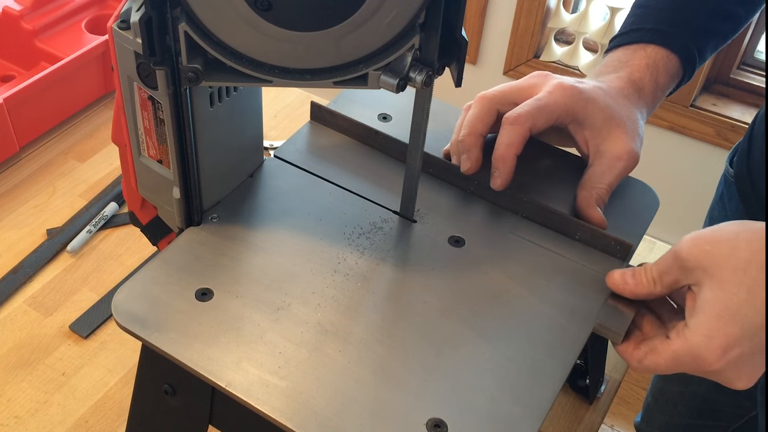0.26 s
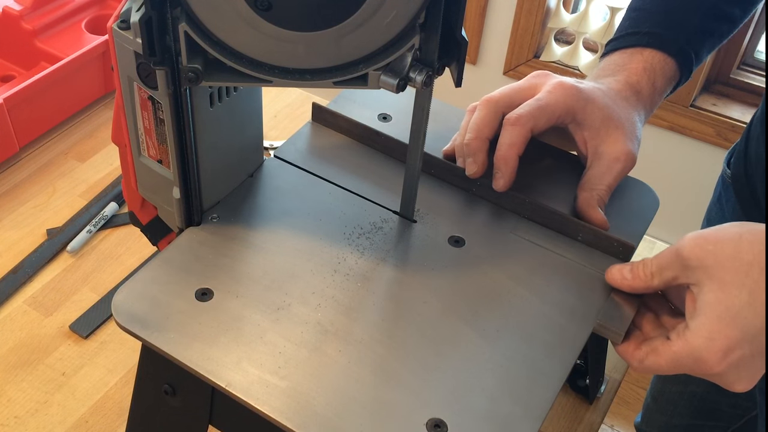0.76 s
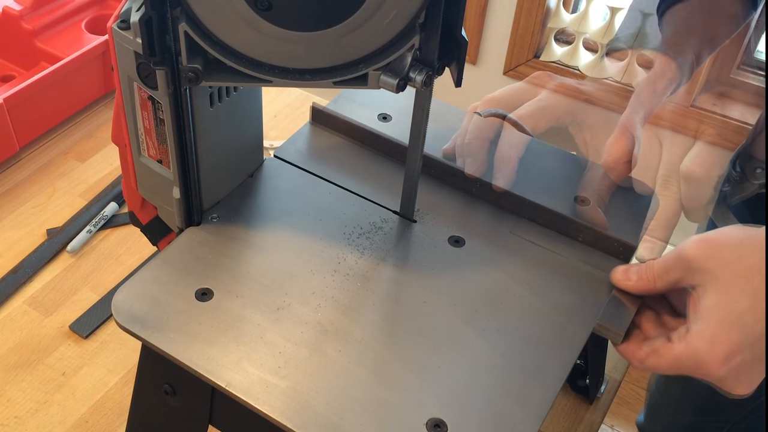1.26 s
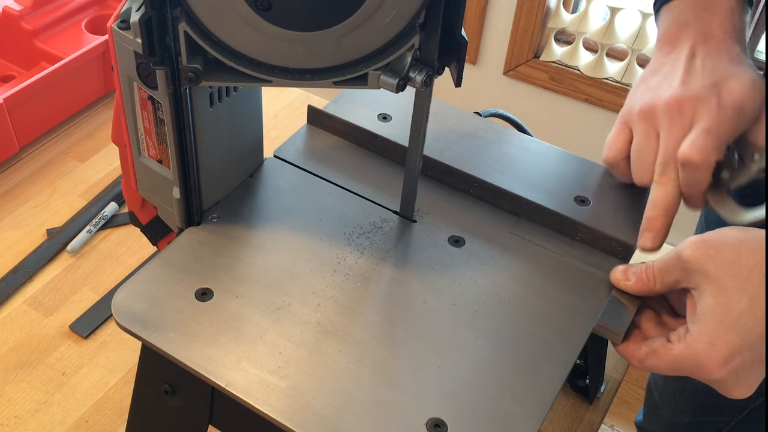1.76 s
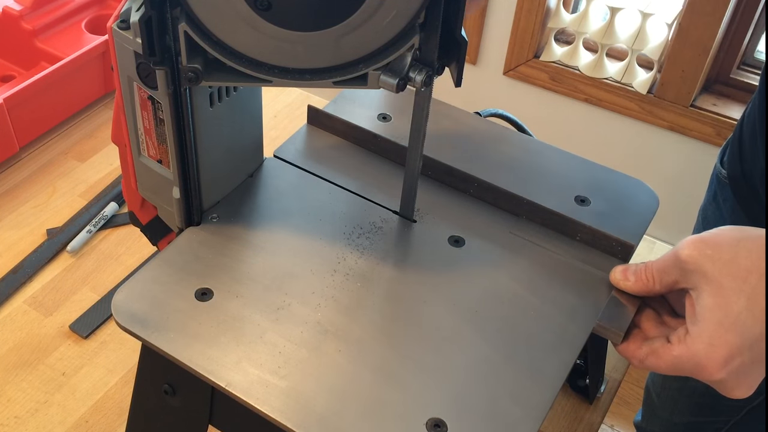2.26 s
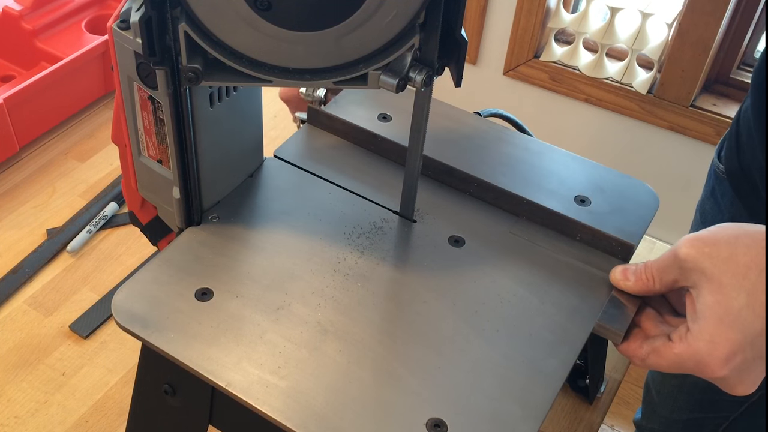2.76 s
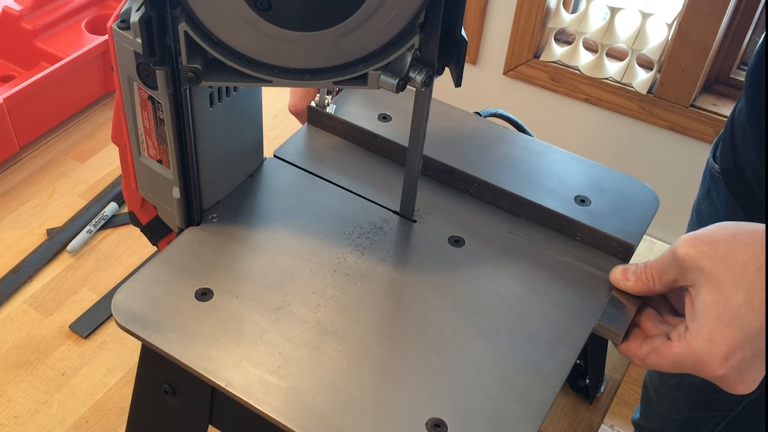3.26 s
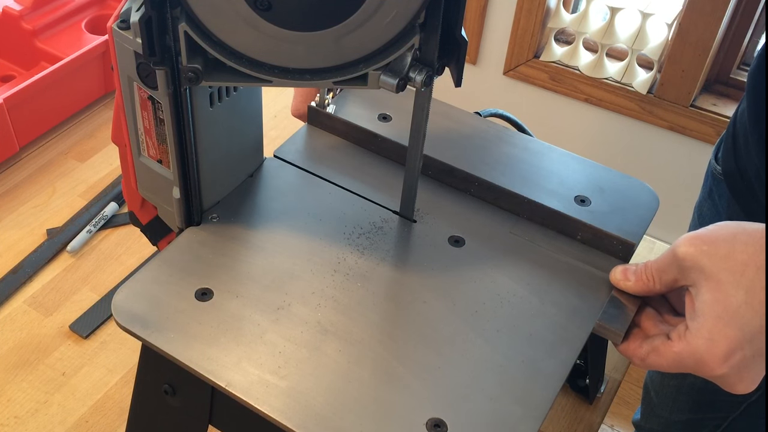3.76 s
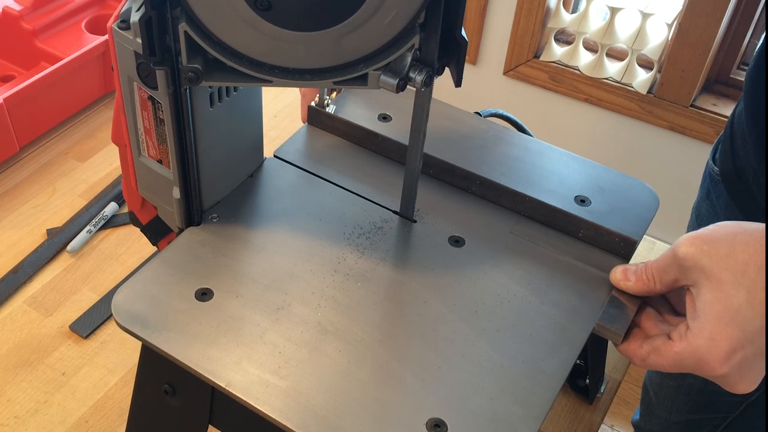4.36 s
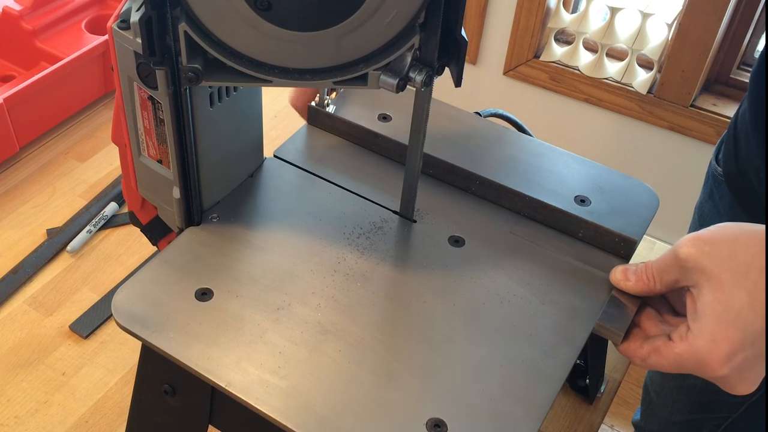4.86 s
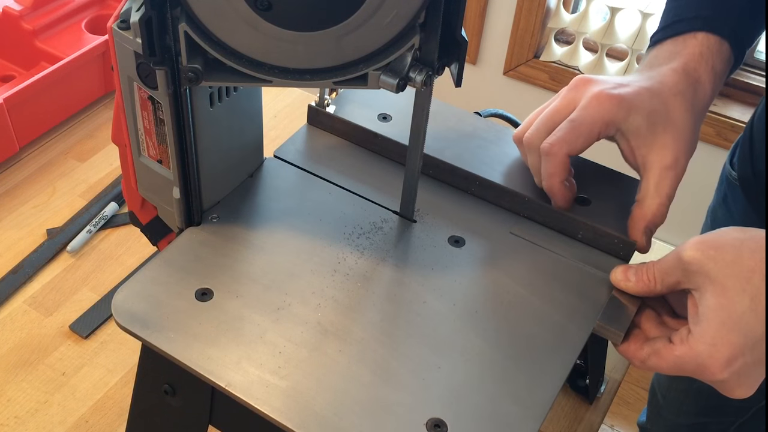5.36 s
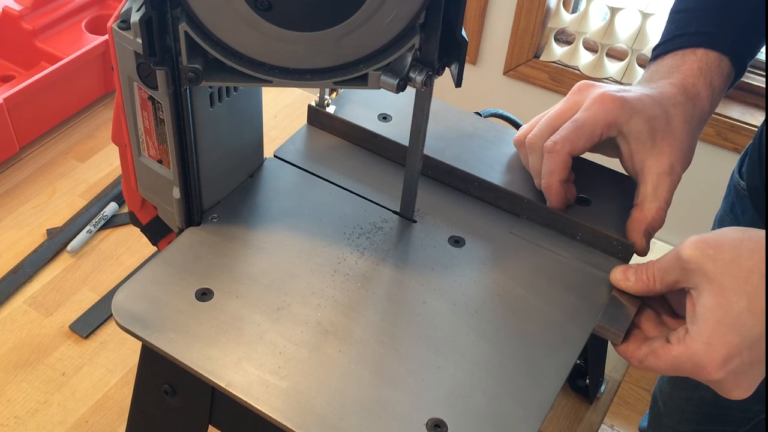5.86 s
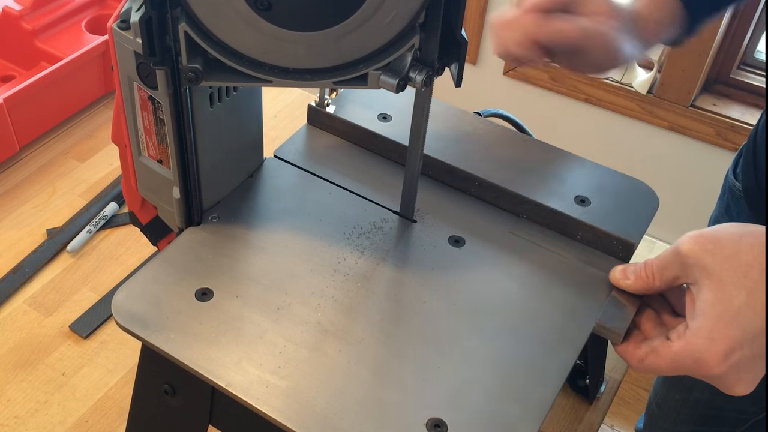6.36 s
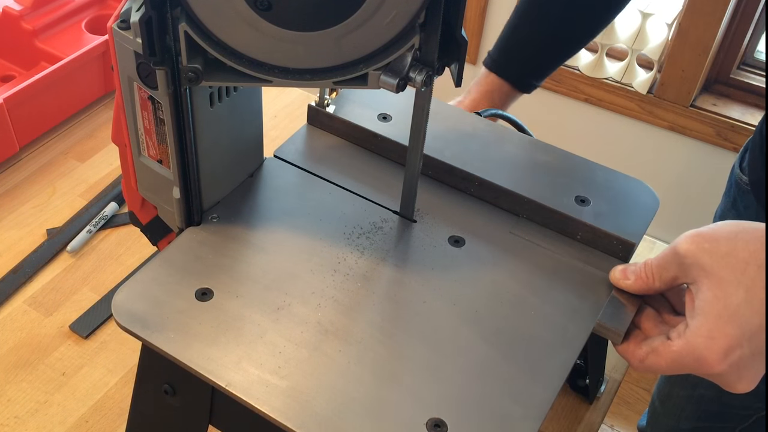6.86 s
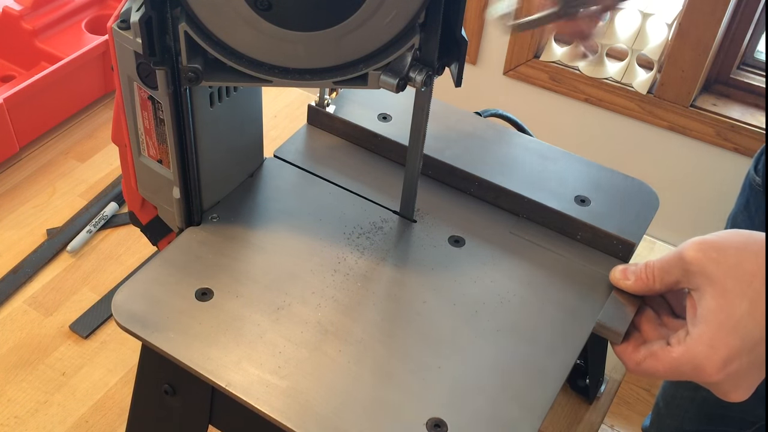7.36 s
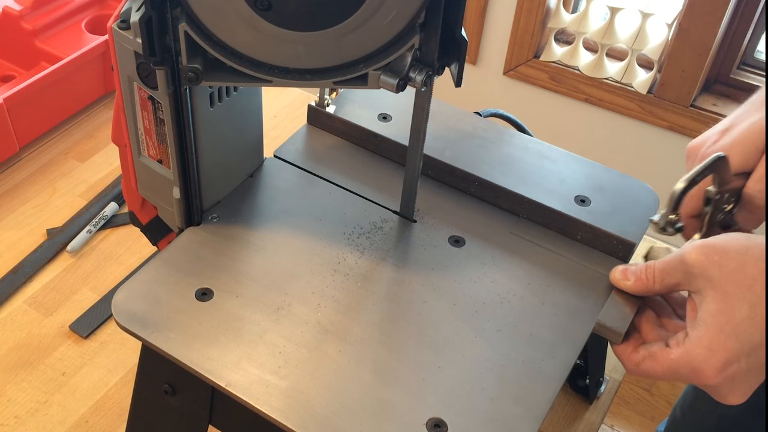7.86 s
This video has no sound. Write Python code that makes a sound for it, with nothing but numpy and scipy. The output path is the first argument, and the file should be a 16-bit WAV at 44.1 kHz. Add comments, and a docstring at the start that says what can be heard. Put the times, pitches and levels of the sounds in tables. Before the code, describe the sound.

Close by in a small, lively workshop, a steel fence knocks and scrapes briefly on a saw table. Loose pliers tick lightly while being fitted, more knocks and a gritty slide follow, then the pliers snap shut with a hard double crack that rings through the stand. A few knocks come after, then a second tool drags off a wooden bench with a dull boom and clicks in the hand.

```python
"""Fence and locking pliers on a steel saw table

In a small workshop a steel fence is shifted and clamped on the table of a stopped bandsaw.
Knocks, ticks and clicks are short noise bursts plus dying sines; slides and drags are grainy noise.
Locking pliers tick as they are fitted, then snap shut: two cracks, and the whole stand rings in many modes.
A second pair is dragged off the wooden bench, which booms in two low sines, and clicks in the hand.
Dense echoes of the room and a quiet background noise surround it all."""
import sys
import numpy as np
from scipy import signal
from scipy.fft import rfft, irfft
from scipy.io import wavfile
from scipy.ndimage import uniform_filter1d

SR = 44100
rng = np.random.default_rng(int(sys.argv[2]) if len(sys.argv) > 2 else 0)


def bounce(signal):
    """Save signal as a 16-bit WAV file at the path given by the first command-line argument."""
    frames = np.transpose(np.atleast_2d(signal))
    limited = np.clip(frames, -1, 1)
    pcm = np.round(limited * 32767).astype(np.int16)
    wavfile.write(sys.argv[1], SR, pcm)


N = 357210
TIME = np.arange(N) / SR  # seconds
SIZE = 4096  # length of a filter, in samples
BINS = np.fft.rfftfreq(SIZE, 1 / SR)  # Hz
PITCHES = np.geomspace(20, 16000, 200)  # Hz, where the colours of touches are worked out

# In all tables t60 is the time a sound takes to die by 60 dB.
# ringing modes of the table and fence: (frequency [Hz], level [dB], t60 [s])
TABLE_AND_FENCE_MODES = [(406, -12.5, 0.083), (465, -12, 0.14), (544, -15.5, 0.098), (808, -15, .2),
                         (896, -12, .2), (1040, -14, 0.22), (1271, -3, 0.067), (1346, -17.5, 0.17),
                         (1460, -18.5, .2), (1617, -12, 0.21), (1704, -13, 0.087), (2078, -9.5, 0.18),
                         (2646, -10.5, .2), (2900, -16.5, .2), (3240, -11.5, .22), (3480, -15.5, 0.069),
                         (3740, -16.5, .15), (4380, -17.5, 0.17), (4760, -15.5, .18), (6900, -13.5, .25)]


def gain_of(db):
    """Turns decibels into a factor."""
    return 10 ** (np.asarray(db) / 20)


def evened(x):
    """Scales a sound to an average strength (rms) of 1."""
    return x / np.sqrt(np.mean(x ** 2) + 1e-20)


def read(points, hz):
    """Reads a curve of (frequency, value) points at any frequency, on a log-frequency axis."""
    f, value = np.transpose(points)
    return np.interp(np.log(hz + 1), np.log(f + 1), value)


def add(mix, s, sound):
    """Mixes a sound in at time s, in seconds."""
    part = mix[round(s * SR):][:len(sound)]
    part += sound[:len(part)]


def causal(gain):
    """Makes the most compact filter response (minimum phase) with this gain over BINS."""
    both_sides = np.r_[gain, gain[-2:0:-1]]
    log_gain = np.log(np.maximum(both_sides, 1e-6))
    return np.fft.ifft(np.exp(np.conj(signal.hilbert(log_gain)))).real


def noise(colour):
    """Makes steady noise of rms 1 whose spectrum follows the colour."""
    spectrum = rfft(rng.standard_normal(N))
    return evened(irfft(spectrum * gain_of(read(colour, np.fft.rfftfreq(N, 1 / SR))), N))


def dying(x, t60s):
    """Lets every band of x die at its own speed."""
    hz, t, bands = signal.stft(x, SR, nperseg=256)
    fade = gain_of(-60 * t / read(t60s, hz)[:, None])
    return signal.istft(bands * fade, SR, nperseg=256)[1][:len(x)]


def ring(modes, count=SR):
    """Struck metal rings in its modes: dying sines, each pushed up or down at random."""
    t = TIME[:count]
    sound = np.zeros(count)
    for hz, db, t60 in modes:
        sound += gain_of(db - 60 * t / t60) * np.sin(2 * np.pi * hz * t) * rng.choice([-1, 1])
    return sound


def contact(colour, t60, edge=1.5, edge_time=0.0009):
    """A hard contact: a sharp edge, then a burst of dense, quickly dying vibration in the given colour."""
    t = TIME[:2 * SIZE]
    closing = 1 - np.exp(-t / 0.00013)  # the faces take a moment to meet fully
    fade = gain_of(-60 * t / t60) + edge * np.exp(-t / edge_time)
    burst = rng.standard_normal(len(t)) * closing * fade
    # the burst's own broad colour is divided out
    own_colour = np.sqrt(uniform_filter1d(abs(rfft(burst)[::2]) ** 2, size=30))
    return signal.fftconvolve(burst, causal(gain_of(read(colour, BINS)) / own_colour))[:len(t)]


def strike(colour, t60, modes, ring_db):
    """A contact and the modes it wakes, each taking its share of the energy at its pitch."""
    woken = []
    for hz, db, life in modes:
        # a long-lived sine starts softer, so that its life does not change its total energy
        life_db = 10 * np.log10(life * SR / (4 * np.log(1000)))
        woken.append((hz, db + ring_db + read(colour, hz) - life_db, life))
    sound = ring(woken, count=SR // 2)
    add(sound, 0, contact(colour, t60))
    return sound


def tick(colour, db, brightness, t60, modes, ring_db, jingle_db, jingle_t60, jingle_hz):
    """Small steel parts touch: a bright tick, a few clear modes and the jingle of many close, high ones."""
    # brightness tilts the colour about 7000 Hz
    levels = db + read(colour, PITCHES) + brightness * np.log2(PITCHES / 7000)
    sound = strike(np.c_[PITCHES, levels], t60, modes, ring_db)
    # the jingle is thinned out below jingle_hz
    jingle = levels + jingle_db - 10 * np.log10(1 + (jingle_hz / PITCHES) ** 2)
    add(sound, 0, contact(np.c_[PITCHES, jingle], jingle_t60))
    return sound


def friction(colour, grain_db):
    """Many tiny slips of uneven size, coloured by what they shake."""
    unevenness = evened(uniform_filter1d(rng.standard_normal(N), size=90))  # wanders within about 2 ms
    slips = rng.standard_normal(N) * gain_of(grain_db * unevenness)
    return evened(signal.oaconvolve(slips, causal(gain_of(read(colour, BINS))))[:N])


def air(level_db=-68):
    """The quiet air of the workshop: steady noise."""
    # colour of the air: (frequency [Hz], relative level [dB])
    air_colour = [(12, -37), (20, -4), (53, -2), (169, -8), (199, -7), (263, -15), (302, -11.5),
                  (511, -17.5), (733, -20.5), (1170, -23), (1390, -24), (1590, -24.5), (2690, -27.5),
                  (15000, -33.5)]
    return gain_of(level_db) * noise(air_colour)


def room(x, build=0.005):
    """Dense echoes from near walls, building up within milliseconds, each band dying at its own speed."""
    # how long the echoes last: (frequency [Hz], t60 [s])
    room_t60 = [(150, 0.23), (1500, 0.9), (5000, 0.76), (8000, 0.53), (11000, 0.35), (15000, 0.4)]
    # how strong they are: (frequency [Hz], level [dB])
    room_level = [(150, 1), (1500, -11), (5000, -15), (10000, -17), (15000, -14.5)]
    growth = 1 - np.exp(-(TIME[:SR] / build) ** 2)
    echoes = rng.choice([-1., 1.], SR) * (rng.random(SR) < .15) * growth
    tail = dying(echoes, room_t60)
    # the strength that comes from each band's life is divided out
    own_strength = np.sqrt(read(room_t60, BINS) * SR * np.mean(echoes ** 2) / (2 * np.log(1000)))
    tail = signal.fftconvolve(tail, causal(gain_of(read(room_level, BINS)) / own_strength))
    return signal.fftconvolve(x, tail)[:N]


def sleeve():
    """Cloth gives a faint, airy swish as the arm reaches out: noise that swells and fades."""
    # a sleeve brushing past: (time [s], length [s], level [dB])
    brushes = [(6.302, 0.29, -78.5), (6.915, 0.23, -66)]
    stroke = np.zeros(N)
    for s, length, db in brushes:
        add(stroke, s, gain_of(db) * signal.windows.hann(round(length * SR)))
    cloth_colour = [(500, -17.5), (2500, 0), (6000, -1), (10000, 1), (15000, -8.0)]  # Hz, dB
    return stroke * friction(cloth_colour, grain_db=-0.5)


def bench(boom_hz=134, boom_t60=.5, upper_hz=180, upper_db=-2, upper_t60=0.073, swell=0.014):
    """The bench top booms: its lowest mode builds up slowly, the next one dies sooner."""
    # pushes that set the bench booming: (time [s], level [dB])
    thuds = [(0.117, -54), (3.525, -51.5), (3.844, -56), (4.906, -32.5), (6.93, -35.5), (7.208, -46)]
    out, t = np.zeros(N), TIME[:SR]
    boom = gain_of(-60 * t / boom_t60) * (1 - np.exp(-t / swell)) * np.sin(2 * np.pi * boom_hz * t)
    boom -= gain_of(upper_db - 60 * t / upper_t60) * np.sin(2 * np.pi * upper_hz * t)
    for s, db in thuds:
        add(out, s, gain_of(db) * boom)
    return out


def drag(split_hz=680, brighten_db=4):
    """The second pliers slide over the wooden bench: a dull rumble that brightens as their weight comes off."""
    # loudness along the drag: (time [s], level [dB])
    path = [(7.055, -61.5), (7.097, -51), (7.145, -58.5), (7.171, -49.5), (7.197, -58), (7.209, -55),
            (7.335, -66.5)]
    # its colour: (frequency [Hz], relative level [dB])
    drag_colour = [(90, -18), (180, 3.5), (260, -11.5), (380, 0.5), (480, -9.5), (570, -4), (670, -10),
                   (790, -5), (1200, -10), (1600, -19), (2400, -23.5), (3500, -28), (8000, -36.5),
                   (15000, -61)]
    s, db = np.transpose(path)
    rub = friction(drag_colour, grain_db=-0.5)
    low = signal.sosfiltfilt(signal.butter(2, split_hz, fs=SR, output="sos"), rub)
    high = rub - low
    lift = gain_of(np.interp(TIME, s[[0, -1]], [-brighten_db, brighten_db]))
    loudness = gain_of(np.interp(TIME, s, db, left=-np.inf, right=-np.inf))  # silent before and after
    return loudness * (low / lift + high * lift)


def slides(ring_db=-8, groan_below_s=.052, groan_steepness=3.3):
    """Steel rubs on steel: a groan in the table's main resonance, a gritty hiss, and the modes both keep ringing."""
    # the fence sliding on the table: (time [s], length [s], level [dB])
    shoves = [(.055, 0.11, -54), (0.902, 0.047, -67.5), (1.679, .067, -66), (3.221, 0.061, -61.5),
              (3.288, .04, -54.5), (3.499, 0.023, -45.5), (3.596, 0.14, -56)]
    # both colours: Hz, dB
    groan = friction([(150, -28.5), (480, -10.0), (700, -16.5), (1050, -22.5), (1285, 3.0), (1480, -22),
                      (1730, -4), (2400, -37.5), (6000, -30), (15000, -40)], grain_db=6.5)
    grit = friction([(200, -1.5), (900, -6.0), (1800, 1.5), (2900, -2.5), (4500, -5.0), (5600, -14),
                     (8000, -23), (15000, -34.5)], grain_db=2.0)
    rub = np.zeros(N)
    for s, length, db in shoves:
        pressure = gain_of(db) * signal.windows.tukey(round(length * SR), .5)
        # short shoves stick and groan, longer ones run free and hiss
        stuck = 1 / (1 + (length / groan_below_s) ** groan_steepness)
        span = slice(round(s * SR), round(s * SR) + len(pressure))
        blend = np.sqrt(stuck) * evened(groan[span]) + np.sqrt(1 - stuck) * evened(grit[span])
        add(rub, s, pressure * blend)
    ringing = evened(signal.fftconvolve(rub, ring(TABLE_AND_FENCE_MODES))[:N])
    return rub + gain_of(ring_db) * np.std(rub) * ringing


def fence():
    """Bouncing clear of the table for a moment, the fence rings undamped."""
    # moments when it rings freely: (time [s], level [dB])
    free_rings = [(.247, -59)]
    # modes of the free fence: (frequency [Hz], level [dB], t60 [s])
    fence_modes = [(3198, -1, .27), (4371, 0, .52), (5545, -13, .4), (6783, -13, .55)]
    out = np.zeros(N)
    for s, db in free_rings:
        add(out, s, gain_of(db) * ring(fence_modes))
    return out


def clicks(faint_t60=0.043, faint_ring_db=1, count=6, uneven=.1):
    """Handles, screw and edges click, singly or in faint, uneven runs."""
    # single clicks: (time [s], level [dB], brightness [dB per octave], t60 [s], ring of the handles [dB])
    single_clicks = [(.114, -3, 6, .026, -15), (.1358, -5, 0.5, 0.087, 9.5), (.1455, -7, 0.5, 0.041, -4),
                     (3.7323, -23, 0, 0.041, -4), (3.9247, -38, -2, 0.034, 3), (5.5022, -38, -1, 0.038, 4),
                     (6.9467, -19, 2, 0.098, 5), (7.2638, -21, 3.5, 0.059, 8), (7.599, -27, 2.5, .014, 15),
                     (7.6416, -7.5, 7, 0.0063, 3.5), (7.6455, -17.5, 6, 0.0084, -4),
                     (7.8796, -34.5, 0, .012, 3)]
    # runs of faint clicks as the fence is let go and the screw is turned:
    # (time [s], length [s], level [dB], brightness [dB per octave])
    rattles = [(1.592, .073, -39.5, -4.5), (2.82, 0.39, -39, 4)]
    # colour of a click: (frequency [Hz], level [dB])
    click_colour = [(300, -13), (1700, 0), (4500, -1.5), (8000, -2), (11500, 2), (15000, -17.5)]
    # modes of the handles: (frequency [Hz], level [dB], t60 [s])
    handle_modes = [(6830, -29.5, 0.17), (7420, -20, 0.12), (10010, -21.5, .06)]
    out, touches = np.zeros(N), list(single_clicks)
    for start, length, db, brightness in rattles:
        # each click strays by a share of the gap between clicks
        gaps_gone = np.arange(count) + uneven * rng.standard_normal(count)
        for s in start + length * gaps_gone / (count - 1):
            touches.append((s, db, brightness, faint_t60, faint_ring_db))
    for s, db, brightness, t60, ring_db in touches:
        add(out, s, tick(click_colour, db, brightness, t60, handle_modes, ring_db,
                         jingle_db=-10, jingle_t60=0.24, jingle_hz=5000))
    return out


def pads(jingle_db=-2, jingle_growth=0.95):
    """The loose jaw pads flop about as the pliers are fitted over the fence; soft ticks jingle less."""
    # ticks of the pads: (time [s], level [dB], brightness [dB per octave])
    pad_ticks = [(2.2995, -27.5, 4), (2.4156, -25, 2), (2.4695, -27, 0.5), (2.525, -22, 2),
                 (2.5559, -21, 1.5), (2.5753, -12.5, 2), (2.6728, -21, 4.5), (2.7028, -25.5, -0.5)]
    # colour of a pad's tick: (frequency [Hz], level [dB])
    pad_colour = [(300, -63), (1700, -9.5), (4500, 0), (8000, -3), (11500, 1), (15000, -10)]
    # modes of a jaw pad: (frequency [Hz], level [dB], t60 [s])
    pad_modes = [(6690, -10, 0.13), (6730, -8.5, 0.15), (8680, -9, 0.066), (8450, -32, .08)]
    out = np.zeros(N)
    usual_db = np.mean([db for s, db, brightness in pad_ticks])
    for s, db, brightness in pad_ticks:
        # only ticks softer than usual lose some of their jingle
        shaken_db = jingle_db + jingle_growth * min(db - usual_db, 0)
        add(out, s, tick(pad_colour, db, brightness, t60=.012, modes=pad_modes, ring_db=-0.5,
                         jingle_db=shaken_db, jingle_t60=0.28, jingle_hz=2970))
    return out


def knocks(ring_db=-11, spot_db=7, spot_width=0.077):
    """Steel knocks on the table or the bench; each struck spot favours its own pitch."""
    # knocks: (time [s], level [dB], weight behind it [dB],
    # hardness: pitch above which it is dull [Hz], pitch the struck spot favours [Hz])
    knock_list = [(0.0288, -4, -15, 2940, 1610), (0.0362, -7.5, 6, 4700, 2830),
                  (0.113, -7.5, 2.5, 8000, 1640), (.2452, -5.5, -12, 4200, 4300),
                  (0.2476, -5, -6, 4200, 1243), (0.6488, -30, 6, 8400, 6800),
                  (3.2023, -10.5, 1, 5300, 4200), (3.5237, -11, -2.5, 5130, 1285),
                  (4.8806, -29, 5.5, 8100, 1700), (4.8907, -17.5, 3, 9000, 5460),
                  (4.894, -10.5, -17, 8500, 5800), (5.8813, -23, 8.5, 5350, 2700),
                  (5.898, -34.5, 13, 5000, 990), (6.0723, -6.5, 4.5, 11500, 2910),
                  (6.9253, -23.5, 15.5, 4200, 434), (6.948, -13, 2, 1500, 1120)]
    # colour of a fully hard knock: (frequency [Hz], level [dB])
    knock_colour = [(20, -36), (90, -12.5), (450, -2), (750, -4), (1300, 0), (1900, 0), (3000, -3.5),
                    (4500, -2), (6500, -4), (9500, -1.5), (15000, -2)]
    out = np.zeros(N)
    for s, db, weight_db, hard_hz, spot_hz in knock_list:
        bass = weight_db / (1 + (PITCHES / 1100) ** 4)  # weight lifts the bass, below about 1100 Hz
        dull = 10 * np.log10(1 + (PITCHES / hard_hz) ** 8.3)  # softness cuts the treble
        favoured = spot_db * np.exp(-(np.log(PITCHES / spot_hz) / spot_width) ** 2)
        colour = np.c_[PITCHES, db + read(knock_colour, PITCHES) + bass - dull + favoured]
        t60 = 0.046 * 2 ** (weight_db / 15)  # a heavier knock chatters longer: doubled per 15 dB
        add(out, s, strike(colour, t60, TABLE_AND_FENCE_MODES, ring_db))
    return out


def snap(crowd_db=-22.5, stand_db=-26, steel_db=-34, rise=0.0024, crack_t60=0.021):
    """The toggle of the pliers goes over centre and jolts table, saw and stand into ringing."""
    # the pliers lock, toggle first and jaws just after: (time [s], level [dB])
    cracks = [(4.9020, 16), (4.9041, 18.5)]
    # colour of a crack: (frequency [Hz], level [dB])
    crack_colour = [(20, -59.5), (110, -28), (470, -16), (800, -22.5), (1300, 0), (2400, -8), (3200, -19),
                    (5300, -4.5), (10500, -21), (14500, -18.5)]
    # the stand's crowd of closer modes: (frequency [Hz], relative level [dB]) and (frequency [Hz], t60 [s])
    crowd_colour = [(30, -42.5), (75, -19.5), (130, -13), (230, -15), (530, -3), (720, -11), (1000, -8.5),
                    (1280, -1), (1900, -3.5), (2650, -10), (3100, -21.5), (4000, -19), (5200, -14),
                    (7600, -14), (10500, -26), (14400, -12), (15400, -30.5)]
    crowd_t60 = [(130, 0.6), (450, 0.28), (1400, 0.51), (2600, 0.4), (5000, 0.38), (8000, 0.35),
                 (11000, 0.28), (14500, 0.17)]
    # clear modes of the jolted stand, then of its steel at higher pitches:
    # (frequency [Hz], relative level [dB], t60 [s])
    stand_modes = [(411, -11.5, .3), (537.5, -7.5, 0.32), (581, -7, 0.11), (1130, -11.5, .5),
                   (1243, -5, 0.4), (1406, -3, 0.24), (1507, -7, 0.21), (1616, -5.5, 0.24),
                   (1780, -10.5, .42), (1823, -9, 0.66), (1917, -7, .48), (1994, -6, 0.3),
                   (2270, -12, 0.23), (2662, -10.5, .38)]
    steel_modes = [(4997, -5.5, 0.2), (5206, -4.5, .26), (5660, -4.5, 0.17), (6900, -7.5, .28),
                   (8000, -7.5, .27), (8303, -6.5, 0.14), (11460, -13.5, .19), (14400, -0.5, .19),
                   (14430, -2, .14), (14702, -5, .13)]
    # steel that sings on after the snap: (frequency [Hz], level [dB], t60 [s])
    singing_modes = [(1367, -62, 5.4), (1815, -53.5, 1.15), (6920, -52.5, .7), (5146, -50, .65)]
    out, jolt = np.zeros(N), cracks[-1][0]
    for s, db in cracks:
        add(out, s, gain_of(db) * contact(crack_colour, crack_t60))
    body = gain_of(crowd_db) * dying(noise(crowd_colour)[:SR], crowd_t60)
    body += gain_of(stand_db) * ring(stand_modes)
    body += gain_of(steel_db) * ring(steel_modes)
    add(out, jolt, body * (1 - np.exp(-TIME[:SR] / rise)))
    add(out, jolt, ring(singing_modes, count=N))
    return out


def scene(snap_room_db=-4):
    """All the handling, the room's answer and its quiet air; the bench boom gets no echoes."""
    handling = knocks() + fence() + slides() + drag() + sleeve() + pads() + clicks()
    lock = snap()
    echoes = room(handling + gain_of(snap_room_db) * lock)
    return (handling + lock + bench() + echoes + air())[None]


def record(dry, edge_hz=15400):
    """Filters away the treble above edge_hz."""
    low_pass = signal.firwin(255, edge_hz, window=("kaiser", 8), fs=SR)
    return signal.oaconvolve(dry, low_pass[None], "same")


dry = scene()
out = record(dry)
bounce(out)
```